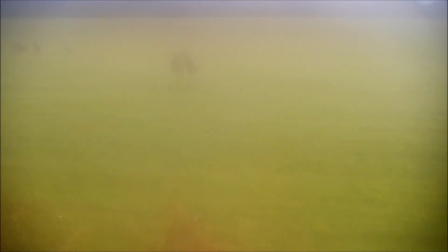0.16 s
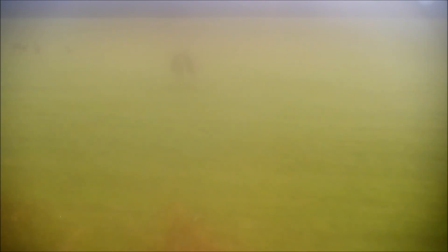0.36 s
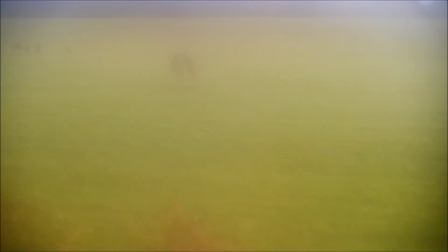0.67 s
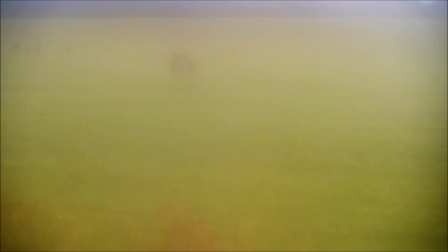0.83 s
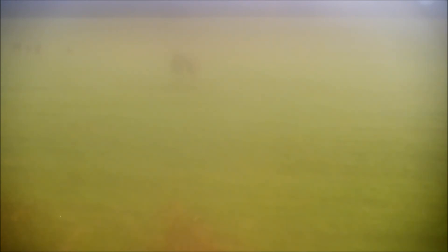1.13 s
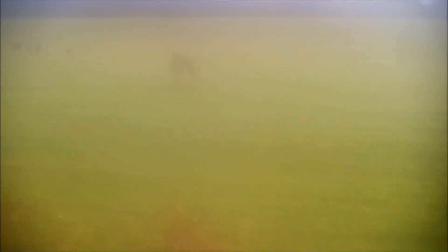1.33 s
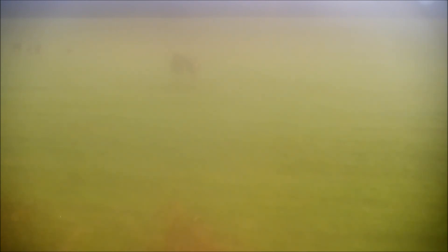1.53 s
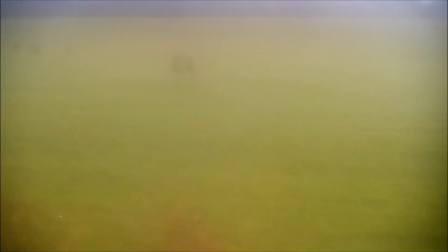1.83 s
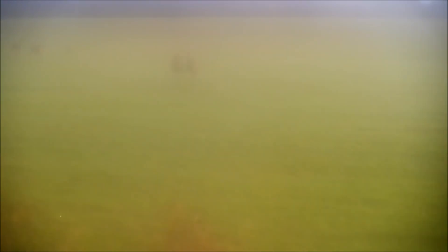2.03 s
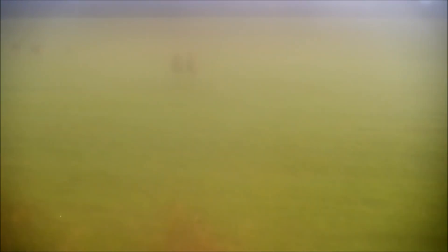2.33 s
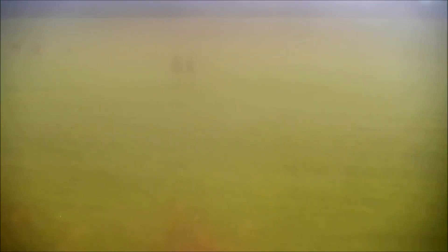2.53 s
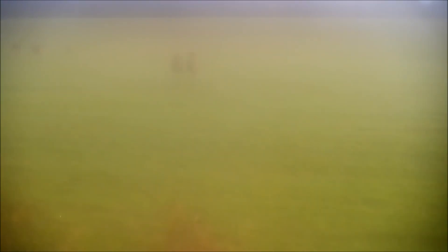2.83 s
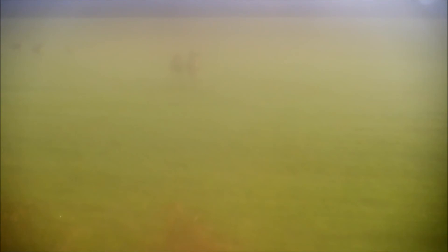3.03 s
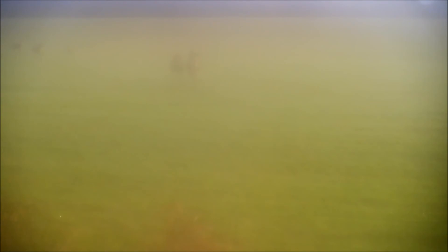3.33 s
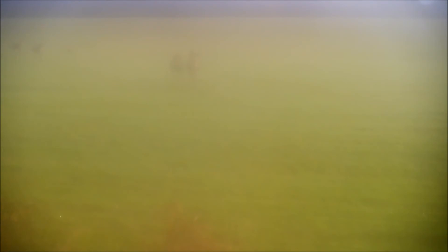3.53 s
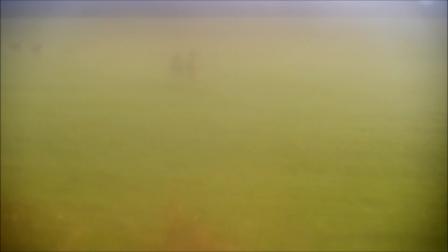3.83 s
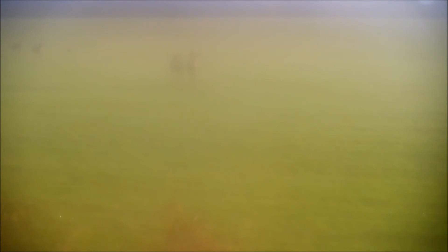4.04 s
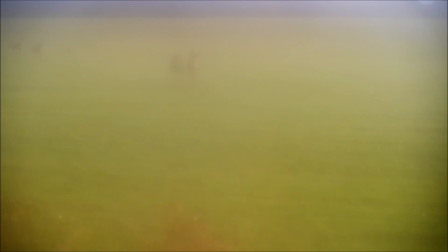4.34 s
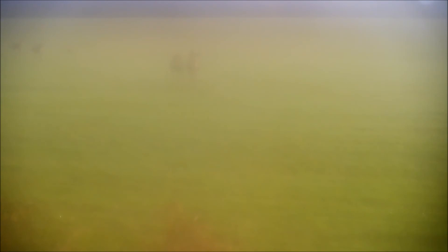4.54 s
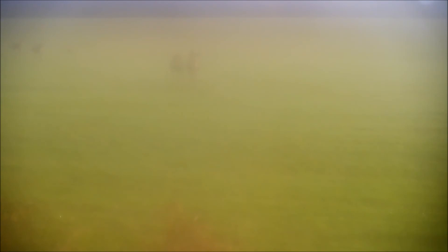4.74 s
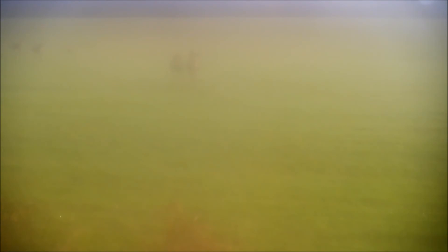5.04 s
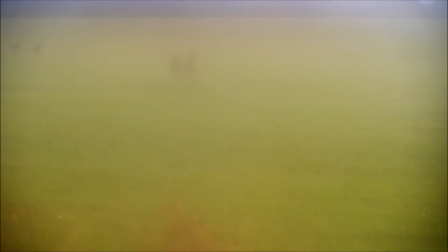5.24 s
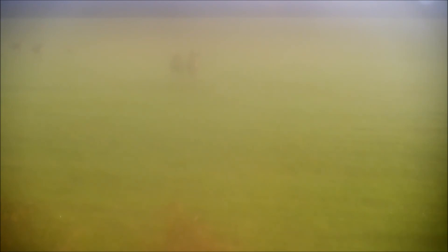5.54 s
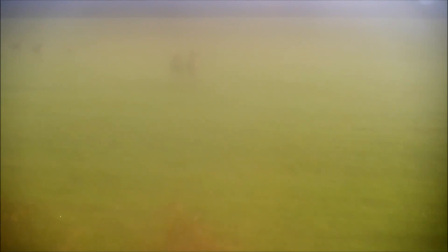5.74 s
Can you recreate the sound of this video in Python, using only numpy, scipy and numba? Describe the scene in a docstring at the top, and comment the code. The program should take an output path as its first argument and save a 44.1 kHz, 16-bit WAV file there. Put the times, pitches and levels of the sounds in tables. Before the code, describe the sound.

A soft, steady rush of air fills an open field, with a camcorder's faint hiss and thin high whine throughout. A light rustle fades in the first half second. A far stag calls faintly at the start and again around 1 to 1.5 seconds, and one dry tick sounds in the grass at 1.6. At 2.2 seconds a red deer stag starts with loose throat knocks that run into a deep, rough roar. It swells, turns harsh, then sinks in pitch and frays out by 3.8. A second, shorter roar runs from about 4.3 to 5.1, rising and then dropping into a rattle. The roars are the loudest sounds, heard from some distance with a light echo from trees. From 2.5 seconds a small bird gives very faint bouts of high, hoarse notes. Near 5.8 a quick run of throaty knocks begins another call.

```python
"""A misty field: a red deer stag roars twice and starts a third roar. Its voice is a source and a
filter: loose glottal knocks run together into a pulse train that rings the throat, and as the larynx
sinks the tract lengthens and its resonances slide down. The ground and far trees scatter the sound.
Behind it are a soft rush of air, a fading rustle, a far stag, one tick in the grass, a small bird,
and a camcorder's hiss and thin whine."""
import sys
import numpy as np
from scipy import signal
from scipy.fft import rfft, irfft, next_fast_len
from scipy.io import wavfile
from scipy.ndimage import uniform_filter1d, map_coordinates
from numba import njit

SR = 44100
rng = np.random.default_rng(int(sys.argv[2]) if len(sys.argv) > 2 else 0)


def write(x):
    x = np.atleast_2d(x).T
    wavfile.write(sys.argv[1], SR, np.round(np.clip(x, -1, 1) * 32767).astype(np.int16))

N = 259749
TIME = np.arange(N) / SR

# Noise spectra. Each row: frequency in Hz, relative level in dB.
AIR_SPECTRUM = [(15, -51), (25, -23), (54, -7), (92, -12.5), (137, -7), (212, -6), (327, -2), (363, -3.5),
                (428, -4.5), (495, -5), (690, -3.5), (942, -4), (1210, -5), (1990, -6.5), (3550, -17.5),
                (4620, -26), (7810, -120)]
HISS_SPECTRUM = [(3500, -30), (4800, -1), (5800, -6.5), (7000, -14.5), (8500, -23)]
RUSTLE_SPECTRUM = [(1800, -39.5), (2400, 6), (2850, 0.5), (3500, -39.5)]
TICK_SPECTRUM = [(1800, -22.5), (2900, 6), (4200, -2), (7000, -40)]
PUFF_SPECTRUM = [(200, -12), (700, 0)]
HOARSE_SPECTRUM = [(2450, -25.5), (2800, 14.5), (3300, 2), (3900, -18.5), (4450, -10), (5000, -27)]
BIRD_SPECTRUM = [(3800, -15), (4900, 6), (5900, 2.5), (6700, -9.5), (7600, -43.5)]
TAPE_SPECTRUM = [(30, 0), (8000, 0), (15000, -1.1)]
# The rustle's decay. Each row: time in seconds, level in dB.
RUSTLE_FADE = [(0, -56.5), (.25, -60.5), (.6, -77.5)]
# The far stag. Each row: centre and half length in seconds, pitch in Hz, harmonics 2 and 3 in dB.
FAR_CALLS = [(.08, 0.059, 98, -50, -69), (1.07, 0.22, 102.2, -63, -59), (1.41, 0.097, 96.9, -57, -54)]
# Throat resonances, mouth narrow. Each row: centre in Hz, level in dB, base width in Hz,
# dB gained per dB of effort, level within a knock in dB.
THROAT_MODES = [(251.4, -17.5, 21.5, 0.61, -21), (317, -12.5, 37, 0.84, -21.5), (502, -33, 40, 1.43, -39),
                (1035, -11.5, 18.8, 0.6242, -15.5), (1523, 2, 73, 1.25, -3.5), (1652, -3, 36, 1.01, -4.5),
                (1752, 0, 66, 1.5, 0.5), (2030, -1, 92, 1.5, -6), (2360, -11.5, 57, 1.43, -20),
                (2670, -20, 65, 0.65, -24), (3600, -39, 220, 0.94, -35.5), (4900, -52.5, 65, 2.5, -58)]
# Those resonances in each roar. Each row: centre in Hz and level in dB with the mouth wide open,
# then the same with the larynx sunk.
SHAPES_A = [(203.4, -10, 188.7, -6.5), (322, -22, 343, -6.5), (530, -41.5, 490, -14.5),
            (1062, -6.5, 810, -7.5), (1206, -10.5, 1159, -3), (1400, -4.5, 1435, -12),
            (2200, -0.5, 1805, -1.5), (2297, -7, 2020, -4), (2460, -13.5, 2390, -10.5),
            (2520, -21.5, 2640, -9.5), (3660, -15.5, 3080, -14.5), (4800, -38, 4400, -31.5)]
SHAPES_B = [(220, -16.5, 195, -9.5), (328.3, -20.5, 357, -12), (535, -29, 510, -24),
            (1030, -10.5, 865, -9.5), (1408, -9.5, 1235, -3), (1616, 0, 1455, -6), (1980, -7, 1820, -2),
            (2157, -0.5, 2230, -0.5), (2340, -18.5, 2510, -1), (2470, -24, 3100, -12.5),
            (3583, -17, 3380, -17), (4670, -46.5, 2400, -41)]
# One gesture a roar. Each row: start, opening time, hold and sinking time constant in seconds,
# nose level in dB.
GESTURES = [(2.332, 0.1575, 0.026, 0.18, -35.5), (4.239, 0.1862, 0.174, 0.16, -44)]
# Lone glottal knocks. Each row: time in seconds, relative level in dB.
GLOTTAL_KNOCKS = [(2.1914, -27), (2.2086, -24.5), (4.2824, -33), (4.294, -29), (4.3279, -26), (5.1412, -29),
                  (5.1633, -28.5), (5.7678, -38), (5.785, -31), (5.7938, -36.5), (5.8038, -25),
                  (5.833, -29.5), (5.8446, -28.5), (5.8552, -23.5), (5.8719, -22), (5.8865, -30.5)]
# Vocal fold rate in each roar. Each row: time in seconds, pitch in Hz.
FOLD_RATE_A = [(2.223, 75.1), (2.3, 92.8), (2.332, 97.9), (2.398, 106.6), (2.45, 107.4), (2.578, 104.3),
               (2.64, 100.5), (2.684, 101.6), (2.79, 97.64), (2.848, 99.1), (2.896, 111.7), (2.986, 109.9),
               (3.154, 100.1), (3.224, 90.6), (3.36, 88.4), (3.528, 79.92), (3.71, 76.85), (3.81, 64.24)]
FOLD_RATE_B = [(4.35, 79.03), (4.444, 95.2), (4.488, 99.9), (4.53, 101.6), (4.59, 101.2), (4.644, 98.2),
               (4.682, 94.8), (4.73, 81.93), (4.766, 80.52), (5.04, 71.77), (5.12, 61.13)]
# Harsh spells of the folds. Each row: centre and half length in seconds, added roughness.
HARSH_SPELLS = [(2.45, .03, .1), (2.73, .095, .42), (2.86, .04, .1)]
# Effort in each roar. Each row: time in seconds, level in dB.
DRIVE_A = [(2.23, -41), (2.238, -37), (2.416, -31.5), (2.46, -34.5), (2.494, -31), (2.938, -30),
           (2.99, -30.5), (3.012, -30.5), (3.354, -34.5), (3.38, -37.5), (3.43, -34), (3.748, -38.5),
           (3.762, -36.5), (3.82, -42.5)]
DRIVE_B = [(4.35, -37), (4.464, -29.5), (4.642, -29.5), (4.778, -34.5), (5.062, -37), (5.116, -50),
           (5.12, -41)]
# Turbulence in the voice, in relative dB: mouth narrow, wide open, larynx sunk.
HOARSE_DB = (-50, -25, -10.5)
# Colour of the voice at a distance. Each row: frequency in Hz, gain in dB.
DISTANCE_COLOUR = [(80, -10), (125, -11.5), (165, -4), (260, 0.5), (360, -4), (450, -9), (680, -9),
                   (800, 1.5), (1600, -1), (2200, -1.5), (2650, -2), (2830, -8), (3300, -4.5), (3600, -6.5),
                   (4000, -12), (4500, -17), (5200, -27), (8000, -43.5)]
# Echo decay. Each row: frequency in Hz, seconds to fall 60 dB.
GROUND_DECAY = [(200, .04), (3000, .04)]
TREE_DECAY = [(200, 0.22), (1500, 1), (5000, 0.043)]
# The bird's bouts. Each row: start, length and note spacing in seconds, level in dB.
BIRD_BOUTS = [(2.467, .85, .19, -66), (3.82, .8, .225, -66.5), (5.036, .75, 0.2065, -65.5)]


def amp(db):
    """Decibels to gain."""
    return 10 ** (np.asarray(db) / 20)


def unit(x):
    """Scale to rms 1."""
    return x / np.sqrt(np.mean(x ** 2) + 1e-20)


def along(points, hz):
    """Interpolation on a logarithmic frequency axis."""
    f, v = np.transpose(points)
    return np.interp(np.log(hz + 1), np.log(f + 1), v)


def curve(rows):
    """Linear interpolation in time, one value a sample."""
    return np.interp(TIME, *np.transpose(rows))


def bell(s, half_s):
    """A Gaussian swell to 1 at time s."""
    return np.exp(-((TIME - s) / half_s) ** 2)


def wobble(rate):
    """A smooth random curve, rate knots a second."""
    return map_coordinates(rng.standard_normal(int(N * rate / SR) + 4), [TIME * rate])


def filtered(x, response):
    """Linear filtering: the spectrum is multiplied by a frequency response."""
    size = next_fast_len(N + SR // 2)
    return irfft(rfft(x, size) * response(np.fft.rfftfreq(size, 1 / SR)), size)[:N]


def coloured(x, spectrum):
    """Filtering by a table of gains in dB."""
    return filtered(x, lambda hz: amp(along(spectrum, hz)))


def noise(spectrum):
    """Coloured noise of rms 1."""
    return unit(coloured(rng.standard_normal(N), spectrum))


def impulses(times, sizes):
    """One sample-wide kick at each time."""
    return np.bincount(np.clip(np.round(times * SR).astype(int), 0, N - 1), sizes, N)


def steady(x, size=1300):
    """Division by the running rms holds the level near 1 over a few fold cycles."""
    power = np.abs(uniform_filter1d(uniform_filter1d(x * x, size), size))
    return x / np.sqrt(power + 1e-3 * power.mean() + 1e-20)


def air(db=-49.5, hiss_db=-76.5):
    """Open air is broadband noise: a slightly restless rush and a faint high hiss."""
    rush = noise(AIR_SPECTRUM) * amp(db + .25 * wobble(3) + .55 * wobble(11))
    return rush + amp(hiss_db) * noise(HISS_SPECTRUM)


def rustle():
    """Narrow-band noise under an uneven, falling envelope is heard as a light rustle."""
    return amp(curve(RUSTLE_FADE) + wobble(30)) * noise(RUSTLE_SPECTRUM)


def far_stag(sag_hz_per_s=50, waver=0.019, fading_db=5.0):
    """Propagation loss leaves only low harmonics of a distant, sagging call, which fade in and out."""
    calls, unsteady = np.zeros(N), 1 + waver * wobble(29)
    for s, half_s, hz, second_db, third_db in FAR_CALLS:
        pitch = (hz - sag_hz_per_s * (TIME - s)) * unsteady
        phase = 2 * np.pi * np.cumsum(pitch) / SR
        calls += bell(s, half_s) * (amp(second_db) * np.sin(2 * phase) + amp(third_db) * np.sin(3 * phase))
    return calls * amp(fading_db * wobble(16.2))


def grass_tick(start_s=1.602, db=-39.0, t60_s=0.011):
    """A dry tick is a transient: a noise burst with a fast exponential decay."""
    envelope = (TIME >= start_s) * amp(db - 60 * np.abs(TIME - start_s) / t60_s)
    return coloured(rng.standard_normal(N) * envelope, TICK_SPECTRUM)


@njit
def resonate(x, hz, width):
    """A driven, damped oscillator whose centre and bandwidth move."""
    y, state = np.zeros(len(x)), 0j
    for i in range(1, len(x)):
        state = state * np.exp((2j * np.pi * hz[i] - np.pi * width[i]) / SR) + x[i]
        y[i] = state.imag
    return y


def formant(x, hz, width):
    """Two resonators in cascade: the narrow one rings, the broad one keeps spectral valleys dark."""
    broad = np.minimum(5 * width, 480)
    ring = resonate(resonate(x, hz, width), hz, broad)
    return np.gradient(ring) * broad / hz


def posture(gesture):
    """Articulation as shares of three shapes: mouth narrow, mouth wide open, larynx sunk."""
    start, open_s, hold_s, sink_s, _ = gesture
    opened = np.clip((TIME - start) / open_s, 0, 1)
    sunk = 1 - np.exp(-np.maximum(TIME - start - open_s - hold_s, 0) / sink_s)
    return np.array([1 - opened, opened - sunk, sunk])


def throat(relax_s=.2, lift=.04, lift_s=0.076, narrow_damping=2.38):
    """A tube's shape sets its modes: the centre, width and level of each follow the posture."""
    rest_hz, rest_db, widths, *_ = np.transpose(THROAT_MODES)
    hz, db, narrow = np.outer(rest_hz, np.ones(N)), np.outer(rest_db, np.ones(N)), np.ones(N)
    for pitch, gesture, shapes in zip([FOLD_RATE_A, FOLD_RATE_B], GESTURES, [SHAPES_A, SHAPES_B]):
        open_hz, open_db, sunk_hz, sunk_db = np.transpose(shapes)
        end = pitch[-1][0]
        held = (TIME > gesture[0]) & (TIME < end + relax_s)
        shares = posture(gesture)[:, held]
        hz[:, held] = np.transpose([rest_hz, open_hz, sunk_hz]) @ shares
        db[:, held] = np.transpose([rest_db, open_db, sunk_db]) @ shares
        # the larynx starts back up as the roar ends
        hz[:, held] *= 1 + lift * np.clip((TIME[held] - end) / lift_s + .5, 0, 1)
        narrow[held] = shares[0]
    damping = 1 + (narrow_damping - 1) * np.outer(rest_hz > 600, narrow)  # upper modes only
    return list(zip(hz, widths[:, None] * damping, db))


def knocks(tract, db=2.0, rebound_s=0.00342, rebound_db=-12.5):
    """Slack folds pop singly, with a weak rebound; each pop sounds the throat's impulse response."""
    s, peak_db = np.transpose(GLOTTAL_KNOCKS)
    pops = impulses(s, amp(peak_db)) + impulses(s + rebound_s, amp(peak_db + rebound_db))
    return sum(amp(db + knock_db + mode_db - rest_db) * formant(pops, hz, width)
               for (hz, width, mode_db), (_, rest_db, *_, knock_db) in zip(tract, THROAT_MODES))


def folds(pitch, base_roughness=.05, fray=.28, fray_s=.14, rasp=0.8):
    """The folds snap shut once a cycle; jitter, shimmer and turbulence make the pulse train rough."""
    start, end = pitch[0][0], pitch[-1][0]
    harsh = sum(more * bell(s, half_s) for s, half_s, more in HARSH_SPELLS)
    rough = base_roughness + fray * np.exp(np.minimum(TIME - end, 0) / fray_s) + harsh
    sounding = (TIME >= start) & (TIME <= end)
    cycles = np.cumsum(curve(pitch) * sounding) / SR
    closures = np.flatnonzero(np.diff(np.ceil(cycles)))
    jitter, shimmer = rng.standard_normal((len(closures), 2)).T
    times = TIME[closures] + .00045 * rough[closures] * jitter
    sizes = amp((.8 + 5 * rough[closures]) * shimmer)
    puffs = unit(noise(PUFF_SPECTRUM) * sounding * (.4 + np.exp(-3 * (cycles % 1))))
    return unit(impulses(times, sizes)) + rasp * rough * puffs


def hoarseness(source, gesture, push_db, end, growth=0.89, wheeze_db=4.5, wheeze_s=0.27):
    """Turbulence follows each snap of the folds, growing with effort and as the air runs out."""
    bursts = np.sqrt(np.abs(uniform_filter1d(source ** 2, size=300)))
    spent_db = wheeze_db * np.exp(np.minimum(TIME - end, 0) / wheeze_s)
    level_db = np.dot(HOARSE_DB, posture(gesture)) + growth * push_db + spent_db
    return amp(level_db) * steady(bursts * noise(HOARSE_SPECTRUM))


def nose(source, gesture, hz=609, width_hz=50., lag_s=0.089, half_s=0.13):
    """The nose is a side resonator of constant pitch, opened briefly as the larynx starts to sink."""
    start, open_s, hold_s, _, db = gesture
    ring = steady(formant(source, np.full(N, hz), np.full(N, width_hz)))
    return amp(db) * bell(start + open_s + hold_s + lag_s, half_s) * ring


def roar(pitch, effort, gesture, tract, db, usual_effort_db=-38.5, low_modes=4):
    """Source and filter: fold pulses ring the throat, whose low modes swell as harmonics cross them."""
    source = folds(pitch)
    push_db = curve(effort) - usual_effort_db
    voice = np.zeros(N)
    for k, ((hz, width, mode_db), (*_, growth, _)) in enumerate(zip(tract, THROAT_MODES)):
        ring = formant(source, hz, width)
        ring = ring * np.sqrt(4 * np.pi * width / SR) if k < low_modes else steady(ring)
        voice += amp(mode_db + growth * push_db) * ring
    voice += hoarseness(source, gesture, push_db, end=pitch[-1][0])
    return amp(db + usual_effort_db) * voice + nose(source, gesture)


def echo(x, decay, delay_s):
    """Diffuse scattering: convolution with a noise tail in which each frequency dies at its own rate."""
    hz, t, spectra = signal.stft(rng.standard_normal(SR), SR, nperseg=256)
    tail = signal.istft(spectra * amp(-60 * t / along(decay, hz)[:, None]), SR, nperseg=256)[1]
    response = np.pad(tail / np.linalg.norm(tail), (int(delay_s * SR), 0))
    return signal.fftconvolve(x, response)[:N]


def bird(half_s=0.072, flutter_db=2.5, jitter_s=.02):
    """A small bird scolds far off: amplitude modulation shapes high noise into short, hoarse notes."""
    power = sum(amp(level) ** 2 * bell(s + jitter_s * rng.standard_normal(), half_s)
                for first, length, gap, level in BIRD_BOUTS for s in np.arange(first, first + length, gap))
    return noise(BIRD_SPECTRUM) * amp(flutter_db * wobble(60)) * np.sqrt(power)


def scene():
    """Superposition: the stag, its scatter from near ground and far trees, and the field's sounds."""
    tract = throat()
    first = roar(FOLD_RATE_A, DRIVE_A, GESTURES[0], tract, db=-1.49)
    second = roar(FOLD_RATE_B, DRIVE_B, GESTURES[1], tract, db=-0.94)
    stag = coloured(first + second + knocks(tract), DISTANCE_COLOUR)
    ground = amp(-16) * echo(stag, GROUND_DECAY, delay_s=.003)
    trees = amp(-22) * echo(stag, TREE_DECAY, delay_s=.04)
    return (stag + ground + trees + far_stag() + bird() + rustle() + grass_tick() + air())[None]


def record(dry):
    """A band-limited channel: the camcorder adds tape hiss and a whine that flips sign at field rate."""
    whine_hz, field_hz, top_hz = 7796, 59.94, 15720
    polarity = np.sign(np.sin(np.pi * field_hz * (TIME - .006)))
    whine = amp(-71.5) * np.sin(2 * np.pi * whine_hz * TIME) * polarity
    hiss = amp(-87) * noise(TAPE_SPECTRUM)
    return filtered(dry[0] + whine + hiss, lambda hz: hz < top_hz)[None]


dry = scene()
out = record(dry)
write(out)
```